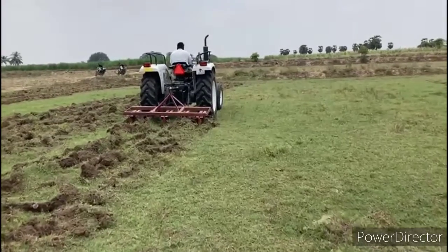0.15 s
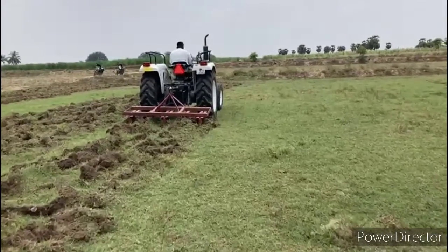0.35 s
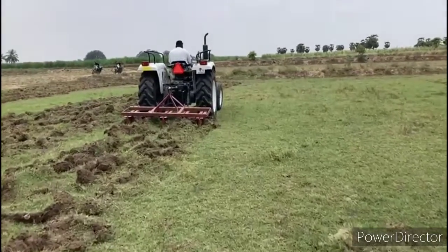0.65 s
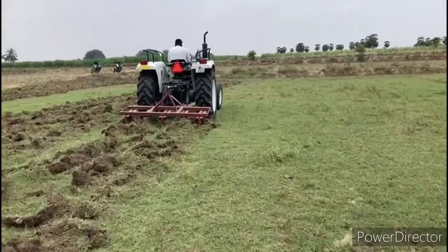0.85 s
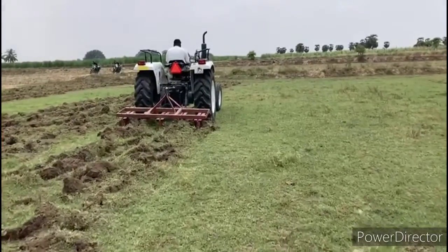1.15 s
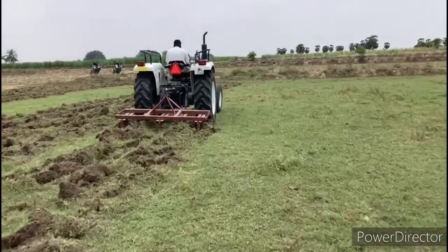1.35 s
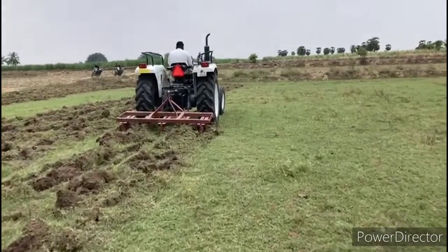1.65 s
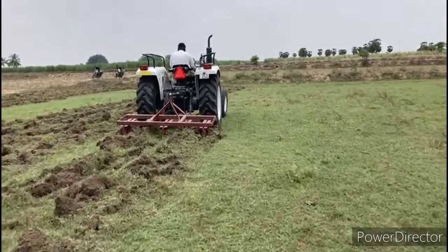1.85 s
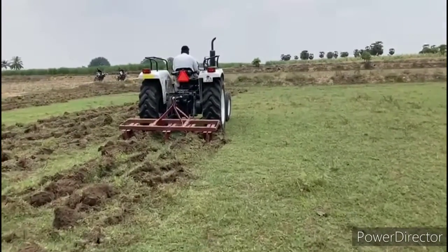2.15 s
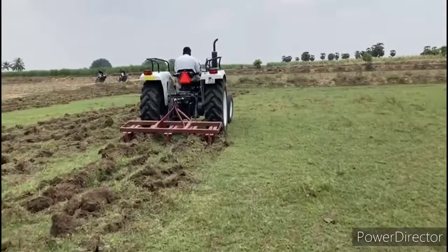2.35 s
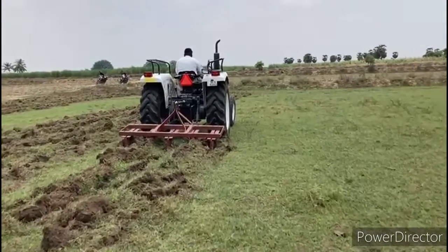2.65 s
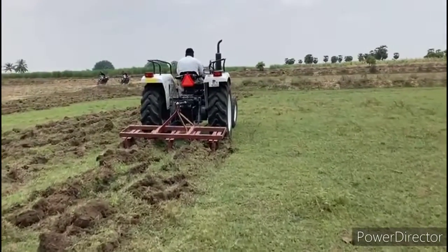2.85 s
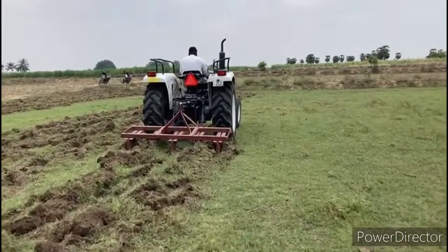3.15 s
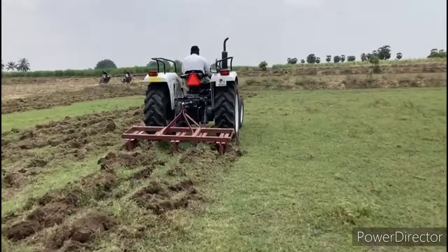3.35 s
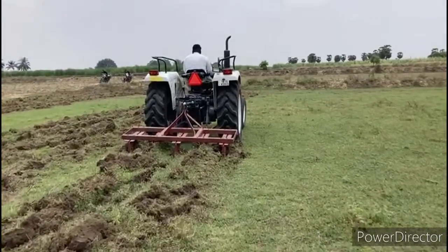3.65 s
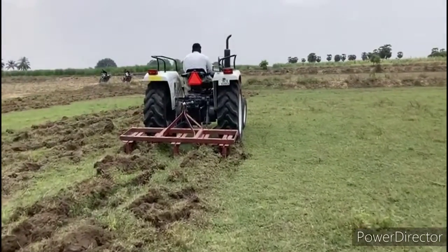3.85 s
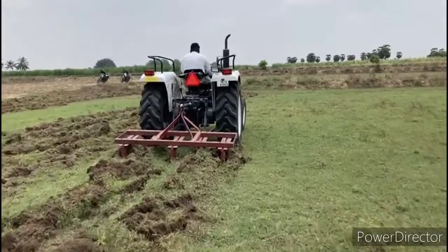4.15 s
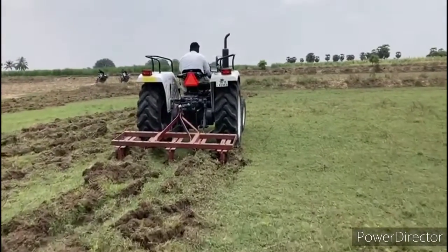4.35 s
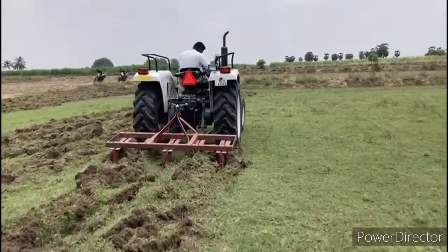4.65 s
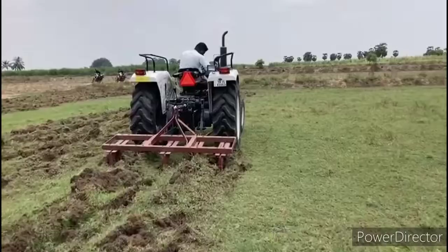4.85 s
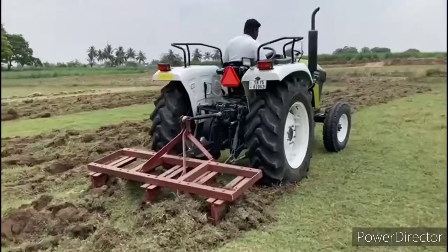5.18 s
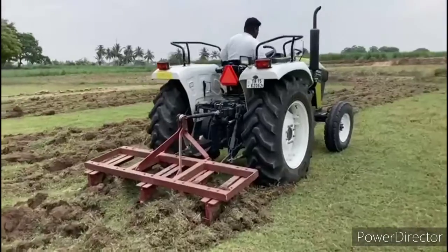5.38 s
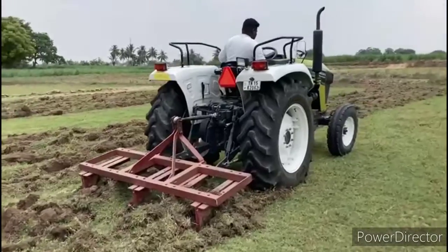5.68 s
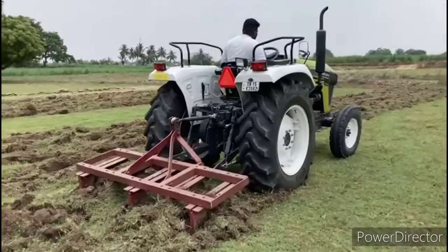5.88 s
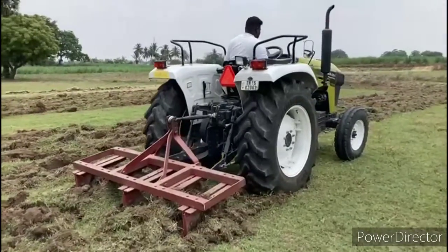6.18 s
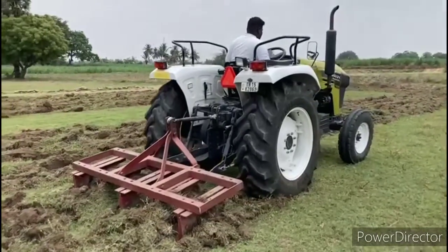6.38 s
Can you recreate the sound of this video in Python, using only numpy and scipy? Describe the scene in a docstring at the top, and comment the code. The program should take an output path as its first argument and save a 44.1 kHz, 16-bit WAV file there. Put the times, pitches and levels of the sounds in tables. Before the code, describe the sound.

A diesel tractor engine revs up, then pulls steadily with a boomy clatter, before jumping suddenly closer and louder as soil crumbles off the tines.

```python
"""Tractor dragging a cultivator

A three-cylinder diesel tractor speeds up in a field and then pulls steadily.
The exhaust booms from shaped noise and tones, the block clatters with every engine cycle,
gears whine, injectors tick, and soil crumbles off the tines as short bursts of noise.
Two microphone ports hear it first from well behind, then abruptly from close beside.
"""
import sys
import numpy as np
from scipy import signal
from scipy.fft import rfft, irfft, next_fast_len
from scipy.io import wavfile
from scipy.ndimage import uniform_filter1d, map_coordinates

SR = 44100
rng = np.random.default_rng(int(sys.argv[2]) if len(sys.argv) > 2 else 0)


def inscribe(sig):
    """Save sig as 16-bit PCM at rate SR to the path in sys.argv[1].

    A 1-D sig is mono; a 2-D sig holds one channel per row.
    Samples are clipped to [-1, 1] before scaling.
    """
    pcm = np.round(np.clip(np.atleast_2d(sig).T, -1, 1) * 32767)
    wavfile.write(sys.argv[1], SR, pcm.astype(np.int16))


N = 287520

CLOSE_S = 5.06  # moment when the listening place jumps from behind to beside
FULL_SPEED = 17.4  # working speed, engine cycles per second

# Engine speed; one cycle is two crank turns and three firings: time_s, speed_cycles_per_s
ENGINE_SPEED = [(0, 12.8), (0.15, 12.9), (0.39, 14.38), (0.72, 14.45), (0.92, 14.87), (1.05, 14.87),
                (1.2, 15.03), (1.35, 16.45), (1.5, 17.45), (1.9, 17.2), (2.9, 17.23), (4, 17.41),
                (5.05, 17.46), (5.07, 17.695), (6.15, 17.7), (6.26, 17.47), (6.36, 17.55), (6.48, 17.75)]
# Combustion bursts within one cycle: place (0-1 of the cycle), size (ratio), length (share of the cycle)
KNOCK_BURSTS = [(0.139, 0.7, 0.12), (0.417, 0.8, 0.059), (0.581, 0.47, 0.09), (.8, 0.24, .07)]
# Treble colour shared by injectors, soil and clods: pitch_hz, level_db (only the shape counts)
HISS_COLOUR = [(1500, -35), (3000, 9), (5500, 1.5), (7500, 10.5), (9600, 4.5), (11200, 9), (12000, -4.5)]


def exhaust(cycles):
    """Firing tones, and rough puffs whose boom climbs with engine speed over the pipe's fixed ring."""
    # Silencer colour at full speed: pitch_hz, level_db (only the shape counts)
    pipe_colour = [(30, -32), (70, -16.5), (120, -10.5), (155, -5), (180, -3.5), (205, -5.5), (245, -15),
                   (330, -29.5), (700, -85)]
    # Extra exhaust tones: multiple of the cycle rate, behind_db, beside_db (relative to the puffs)
    exhaust_tones = [(4, -29, -18), (7, -12, -14), (8, -21, -14), (9, -16.5, -11.5), (10, -6, -5),
                     (11, -15.5, -12.5), (12, -8.5, -6.5)]
    # Level of the silencer's boom: time_s, level_db
    boom_level = [(0, -29.5), (.3, -30.5), (.5, -28.5), (1, -29), (1.7, -25.5), (2.2, -24.5), (2.65, -25),
                  (3.3, -24), (3.56, -27), (3.7, -24), (4.3, -23.5), (4.55, -24.5), (5.05, -21.5),
                  (5.4, -21.5), (5.48, -22.5), (5.7, -21), (6, -21), (6.52, -21)]
    # Level of the firing tone: time_s, level_db
    firing_level = [(0.0, -47), (0.6, -44), (1.24, -45), (1.32, -33), (1.56, -45), (1.68, -38), (2.52, -41),
                    (2.84, -44), (4.12, -41), (4.8, -38.5), (5.28, -35), (5.92, -32), (6.32, -35),
                    (6.52, -34)]
    # Level of its octave: time_s, level_db
    octave_level = [(0.0, -42), (0.28, -30.5), (0.56, -37), (1.12, -35), (1.56, -30.5), (1.96, -39),
                    (2.08, -33), (2.48, -34), (2.6, -34), (3.28, -34), (3.48, -33.5), (3.92, -32.5),
                    (4.04, -39.5), (4.88, -37.5), (5.56, -33), (5.84, -32), (6.36, -28), (6.52, -34)]
    # Level of its third harmonic, which sings as the engine speeds up: time_s, level_db
    third_level = [(0, -48), (.35, -41), (.6, -29.5), (.9, -31.5), (1.3, -35), (1.7, -52)]

    steady = np.arange(N) / SR * FULL_SPEED
    puffs = colour(rng.standard_normal((2, N)) * bursts(steady, KNOCK_BURSTS, base=2.7), pipe_colour)
    # Play the steady puffs slower or faster, so their pitch follows the engine.
    position = cycles * SR / FULL_SPEED
    climbing = np.array([map_coordinates(side, [position], mode="mirror") for side in puffs])
    ring = colour(rng.standard_normal((2, N)) * bursts(cycles, KNOCK_BURSTS, base=1.2), pipe_colour)
    tones = lines(cycles, exhaust_tones, waver_db=2.5, drift=0.455)
    boom = amp(-4.0) * climbing + amp(-6.5) * ring + tones
    boom = amp(curves(boom_level)[0]) * evened(boom, seconds=.06, share=.7)

    firings = 3 * cycles
    throb = 0
    for multiple, level in enumerate([firing_level, octave_level, third_level], 1):
        phase = 2 * np.pi * multiple * firings + multiple * 0.17 * wobble(7.2)
        throb = throb + amp(curves(level)[0]) * np.sqrt(2) * np.sin(phase)
    return boom + boom_swells(boom[0]) + throb


def boom_swells(boom):
    """The boom swells irregularly for a few periods, starting from its own phase."""
    # Boom swells: peak_s, level_db (before the trim below), pitch_hz, length_s
    swell_table = [(0.168, -26, 174, .03), (0.38, -28, 174, .025), (0.452, -24, 185, .025),
                   (.477, -24, 190, 0.018), (0.827, -24, 166, .025), (0.912, -20, 155, .035),
                   (0.978, -18.5, 159, 0.027), (1.037, -21, 160, .025), (1.1, -22, 162, .025),
                   (1.161, -20, 160, .025), (1.229, -21.5, 170, 0.035), (1.315, -19.5, 162, 0.066),
                   (1.55, -21, 176, .03), (1.754, -18, 175, .03), (1.814, -21, 175, 0.033),
                   (1.87, -27, 173, .025), (2.173, -20.5, 192, .03), (2.212, -22, 185, .025),
                   (2.304, -22, 176, .04), (2.506, -20, 176, 0.022), (2.543, -20.5, 190, 0.028),
                   (2.787, -16.5, 177, 0.073), (2.877, -19.5, 172, 0.033), (2.978, -25, 187, .025),
                   (3.222, -22, 177, 0.026), (3.418, -21, 174, 0.056), (3.627, -18.5, 174, 0.045),
                   (3.685, -17, 183, .03), (3.751, -21, 180, 0.027), (3.846, -15, 172, .03),
                   (3.894, -17, 186, 0.028), (4.091, -20, 180, 0.021), (4.269, -17.5, 183, .035),
                   (4.36, -14.5, 190, 0.032), (4.679, -17, 186, 0.027), (4.731, -17, 194, .025),
                   (4.781, -17, 175, 0.038), (4.944, -17.5, 186, 0.028), (5.008, -24, 181, 0.028),
                   (5.194, -16.5, 194, .03), (5.303, -18, 187, 0.03), (5.384, -14, 181, 0.054),
                   (5.592, -18, 192, .025), (5.64, -14.5, 189, 0.033), (5.865, -16, 190, 0.035),
                   (5.903, -23, 185, 0.028), (6.01, -22, 176, 0.022), (6.1, -21, 174, 0.023),
                   (6.159, -19, 180, .025), (6.298, -14, 175, 0.029), (6.353, -15, 183, 0.019),
                   (6.41, -15, 185, 0.032), (6.457, -14, 178, 0.022)]
    trim_db = -3.5
    t = np.arange(N) / SR
    boom_phase = np.angle(signal.hilbert(boom))
    total = 0
    for peak_s, level_db, pitch_hz, length_s in swell_table:
        swell = amp(level_db + trim_db) * np.exp(-(2 * (t - peak_s) / length_s) ** 2)
        start_phase = np.take(boom_phase, int(peak_s * SR), mode="clip")
        total = total + swell * np.sqrt(2) * np.cos(2 * np.pi * pitch_hz * (t - peak_s) + start_phase)
    return total


def block(cycles):
    """Combustion thuds in the lower block and clatters in the panels, over droning harmonics and fan."""
    # Thud bursts within one cycle: place (0-1 of the cycle), size (ratio), length (share of the cycle)
    thud_bursts = [(0.122, 0.54, 0.14), (.47, 0.096, 0.075), (.8, 0.22, 0.099)]
    # Lower block colour from behind: pitch_hz, level_db (only the shape counts)
    thud_behind = [(140, -25), (260, -5.5), (340, -10.5), (520, -12), (750, -15), (950, -21), (1300, -47)]
    # The same from beside: pitch_hz, level_db
    thud_beside = [(140, -24), (250, -3), (390, -4), (490, -9.5), (750, -12.5), (950, -14.5), (1300, -56)]
    # Upper block colour from behind: pitch_hz, level_db (only the shape counts)
    clatter_behind = [(600, -37), (1000, -18.5), (1500, -21.5), (1850, -25), (3000, -34), (5000, -84)]
    # The same from beside: pitch_hz, level_db
    clatter_beside = [(600, -42), (1030, -21.5), (1400, -15), (1650, -25.5), (2000, -16.5), (2500, -36),
                      (5000, -90)]
    # Resonances of block, bonnet and mudguards: pitch_hz, width_hz, lift_behind_db, lift_beside_db
    panels = [(417, 24, -0.5, 6), (519, 49, 4, -0.5), (680, 59, 1, -0.5), (593, 39, -1.5, 6.5),
              (764, 89, 1.5, 3), (905, 100, 2, 3), (1164, 215, 5, 6), (1322, 46, 4, 1), (1462, 51, 8, 5.5),
              (1556, 50, 7, 4)]
    # Fan and block tones: multiple of the cycle rate, behind_db, beside_db (before the shared trim)
    whine_tones = [(15.3, -1.5, -2), (18, -19, -7.5), (19, -16, -19), (20, -21, -14), (21, -24, -13),
                   (22, -24, -10), (23, -17, -16), (24, -24, -11), (26, -16, -15), (28, -17, -17),
                   (29, -17, -23), (30, -13, -20), (31, -17, -21), (33, -19, -16), (36, -19, -21),
                   (38, -22, -18), (39, -16, -26), (40, -16, -14), (42, -25, -12), (43, -25, -15),
                   (44, -20, -22), (53, -28, -20), (62, -22, -25), (65, -23, -27), (66, -27, -19),
                   (76, -18.5, -14), (83, -27, -17), (84, -20, -22), (86, -22, -28), (93, -27, -32),
                   (98, -33, -20)]
    # Lower block loudness: behind_db, beside_db, db per halving of distance, db per extra cycle/s,
    # db at full throttle
    thud_law = (-30, -30, 7, 0.9, 0.6)
    # Loudness of the upper block and panels: same columns
    clatter_law = (-36.5, -36, 5, 0.72, 2.3)

    shaken = cycles + .0025 * wobble(9)  # the crank never turns quite evenly
    thuds = repeating(shaken, loose=.75) * bursts(cycles, thud_bursts, base=.9) * amp(1.0 * wobble(50))
    knocks = repeating(shaken, loose=.62) * bursts(cycles, KNOCK_BURSTS, base=1.2) * amp(1.2 * wobble(28))
    thuds, knocks = patchy(thuds), patchy(knocks)
    rear = [(hz, width, db) for hz, width, db, _ in panels]
    flank = [(hz, width, db) for hz, width, _, db in panels]
    thud = by_view(colour(thuds, thud_behind, rear), colour(thuds, thud_beside, flank))
    clatter = by_view(colour(knocks, clatter_behind, rear), colour(knocks, clatter_beside, flank))
    whine = amp(by_view(-4, -7)) * lines(shaken, whine_tones, waver_db=3, drift=.45)
    lower = amp(by_view(-0.73, -.6)) * thud + whine
    return loudness(thud_law) * lower + loudness(clatter_law) * clatter


def valves(cycles):
    """The valve train rattles lightly: dense taps that swell with the knocks."""
    # Valve colour from behind: pitch_hz, level_db (only the shape counts)
    valves_behind = [(1200, -6), (1700, -0.5), (2100, 5.5), (2280, 3.5), (2450, 1), (3100, -0.5),
                     (4000, -3.5), (5100, -11), (9000, -49)]
    # The same from beside: pitch_hz, level_db
    valves_beside = [(1200, -15), (1700, 5.5), (2100, 3.5), (2350, 2.5), (2750, -0.5), (3400, -4),
                     (3900, -1), (5000, -6), (6200, -8.5), (9000, -18)]
    # Valve loudness: behind_db, beside_db (before the trims below), db per halving of distance,
    # db per extra cycle/s, db at full throttle
    valves_law = (-40.5, -38.5, 6.5, 1.26, 0.5)
    taps = repeating(cycles, loose=0.86) * bursts(cycles, KNOCK_BURSTS, base=2.9) * amp(1.0 * wobble(22))
    taps = patchy(taps)
    rattle = by_view(amp(1.5) * colour(taps, valves_behind), amp(0.76) * colour(taps, valves_beside))
    return loudness(valves_law) * rattle


def gears(cycles):
    """The timing gears sing thinly at fixed multiples of the cycle rate."""
    # Gear tones: multiple of the cycle rate, behind_db, beside_db (relative to the level below)
    gear_tones = [(126, 0, 0), (133, -4, -12)]
    # Level of the gear song: time_s, level_db
    gear_level = [(0, -58), (.5, -53.5), (1, -56), (1.6, -65), (4, -65), (4.7, -59), (6.52, -58)]
    return amp(curves(gear_level)[0]) * lines(cycles, gear_tones, waver_db=3, drift=0.57)


def treble(crank):
    """Injector ticks and falling soil share one level that changes over time."""
    # Shared treble level: time_s, level_db (before the mix gains below)
    treble_level = [(0.0, -65), (0.24, -53), (0.56, -59), (0.88, -55.5), (1.04, -55.5), (1.4, -48),
                    (2.72, -49.5), (3.0, -50.5), (3.28, -47), (3.4, -51.5), (4.16, -47), (4.88, -48),
                    (5.05, -49.5), (5.07, -43), (6.32, -39), (6.52, -37.5)]
    mix = amp(1.5) * injectors(crank) + amp(-10.5) * soil(per_second=1200, spread_db=10.0)
    return amp(curves(treble_level)[0]) * mix


def injectors(cycles):
    """Bright ticks of noise, one cylinder much sharper than the others."""
    # Ticks within one cycle: place (0-1 of the cycle), size (ratio), length (share of the cycle)
    tick_bursts = [(.14, 0.48, 0.15), (.49, 0.97, 0.083), (.82, .17, 0.047)]
    ticks = by_view(bursts(cycles, tick_bursts, base=0.54), bursts(cycles, tick_bursts, base=0.89))
    ticks = uniform_filter1d(ticks, size=120)  # each tick swells over a few milliseconds
    return colour(rng.standard_normal((2, N)) * ticks * amp(1.67 * wobble(30)), HISS_COLOUR)


def soil(per_second, spread_db):
    """Crumbs and dry roots break off the tines in clumps: random clicks of random size."""
    chance = per_second / SR * amp(5.8 * wobble(6))
    sizes = amp(spread_db * np.minimum(rng.exponential(size=N), 3))
    crumbs = (rng.random(N) < chance) * sizes * rng.standard_normal((2, N))
    return colour(crumbs, HISS_COLOUR)


def clods():
    """A few big clods crack on the tines with a short, fading crunch of noise."""
    # Clods: start_s, level_db
    clod_table = [(1.408, -44), (1.641, -43), (5.416, -36), (5.529, -45), (6.263, -39), (6.322, -30.5),
                  (6.49, -40)]
    decay_s = 0.013
    t = np.arange(N) / SR
    crunch = sum(amp(db) * (t >= s) * np.exp(-np.abs(t - s) / decay_s) for s, db in clod_table)
    return colour(rng.standard_normal((2, N)), HISS_COLOUR) * crunch


def tick():
    """One small bright tick as the listening place changes: a single spike without its bass."""
    spike = amp(-17) * (np.arange(N) == round(CLOSE_S * SR))
    return filtered(spike, lambda hz: hz / (hz + 1500))


def throttle():
    """Extra fuel, 0-1: it follows the gain in engine speed, and is zero in the close view."""
    full_rise = 3.9  # gain of speed at full fuel, cycles per second each second
    smooth_s = 0.047
    rise = by_view(np.gradient(curves(ENGINE_SPEED)[0]) * SR, 0)
    return uniform_filter1d(np.clip(rise / full_rise, 0, 1), size=max(1, int(smooth_s * SR)))


def loudness(law):
    """Gain of one part: it grows with nearness, engine speed and throttle."""
    # Distance to the tractor: time_s, distance_m
    distance = [(0, 13.5), (5.05, 8.46), (5.07, 5.9), (6.52, 4.63)]
    reference_m = 9
    behind_db, beside_db, near_db, speed_db, throttle_db = law
    halvings = np.log2(reference_m / curves(distance)[0])
    extra_speed = curves(ENGINE_SPEED)[0] - FULL_SPEED
    return amp(by_view(behind_db, beside_db) + near_db * halvings
               + speed_db * extra_speed + throttle_db * throttle())


def bursts(cycles, table, base):
    """Envelope of rms 1: sharp decaying bursts at fixed crank angles over a steady base."""
    return unit(base + sum(size * np.exp(-((cycles - place) % 1) / length) for place, size, length in table))


def repeating(cycles, loose, size=2520):
    """Two dense trains of contacts that recur every cycle; the share loose is new each time."""
    loose = np.clip(loose, 0, 1)
    spectrum = np.exp(2j * np.pi * rng.random((2, size // 2 + 1)))
    place = np.arange(size) / size
    locked = np.array([np.interp(cycles % 1, place, p, period=1) for p in irfft(spectrum, size)])
    return np.sqrt(1 - loose) * unit(locked) + np.sqrt(loose) * rng.standard_normal((2, N))


def lines(cycles, table, waver_db, drift):
    """Tones tied to the crank, each wavering a little in strength and phase."""
    total = 0
    for order, behind_db, beside_db in table:
        strength = amp(by_view(behind_db, beside_db) + waver_db * wobble(7))
        phase = 2 * np.pi * (order * cycles + rng.random()) + drift * wobble(5)
        total = total + strength * np.sqrt(2) * np.sin(phase)
    return total


def patchy(pair):
    """Narrow resonances swell and fade at random, each for about a tenth of a second."""
    spread_db = 1.8  # how far the resonances come and go, rms
    z = signal.stft(pair, nperseg=2048)[2]
    field = uniform_filter1d(rng.standard_normal(z.shape[1:]), size=2, axis=0)  # across pitch
    field = uniform_filter1d(field, size=5, axis=1)  # across time
    return unit(signal.istft(z * amp(spread_db * unit(field)), nperseg=2048)[1][:, :N])


def evened(pair, seconds, share):
    """Take a share out of the slow swells and leave the quick beats."""
    power = np.abs(uniform_filter1d(np.mean(pair[:1] ** 2, axis=0), size=max(1, int(seconds * SR))))
    return unit(pair / (power + 1e-9) ** (.5 * np.clip(share, 0, 1)))


def colour(pair, spectrum, modes=()):
    """Shape a pair of signals by a spectrum with resonant lifts, to rms 1."""
    def lift_db(hz):
        return sum(db / (1 + (2 * (hz - centre) / width) ** 2) for centre, width, db in modes)
    return unit(filtered(pair, lambda hz: amp(along(spectrum, hz) + lift_db(hz))))


def ports(pair):
    """A shared and an unshared part reach the two ports, with a phase lead that depends on the view."""
    # Likeness of the two ports: pitch_hz, likeness (0-1), left lead behind and beside (half turns)
    port_table = np.array([(60, .98, 0, 0), (150, .993, 0, 0), (600, .975, 0, 0), (1300, .93, .03, 0),
                           (1900, .6, .25, -.1), (2280, .55, 1, 1), (2600, .7, 2.25, 1.85),
                           (4300, .55, 2.3, 1.75), (5200, .95, 2.95, 1.6), (6000, .95, 2.95, 1.8),
                           (6600, .97, 2, 2), (7500, .95, 1.95, 1.95), (8500, .97, 1.05, 1.05),
                           (9800, .97, .95, .95), (10500, .99, 0, 0)])
    # Balance between the ports: pitch_hz, left_minus_right_db
    balance = [(30, -2), (70, -1.5), (150, 0), (300, .2), (700, 1.4), (1400, 2.4), (2800, 3.3), (4200, -.1)]

    def column(hz, axis):
        return along(port_table[:, [0, axis]], hz)

    def turn(hz):  # an angle that splits shared from unshared sound
        return np.arccos(np.clip(column(hz, axis=1), 0, 1)) / 2

    shared, apart = filtered(pair, lambda hz: np.array([np.cos(turn(hz)), np.sin(turn(hz))]))
    both = np.array([shared + apart, shared - apart])
    half = np.array([[.5], [-.5]])  # each port takes half of the difference

    def heard(axis):
        return filtered(both, lambda hz: amp(half * along(balance, hz))
                        * np.exp(1j * np.pi * half * column(hz, axis=axis)))
    return by_view(heard(axis=2), heard(axis=3))


def by_view(behind, beside):
    """The listening place changes at one instant."""
    return np.where(np.arange(N) < CLOSE_S * SR, behind, beside)


def amp(db):
    """Decibels to gain."""
    return 10 ** (np.asarray(db) / 20)


def unit(x):
    """Scale to rms 1."""
    return x / np.sqrt(np.mean(x ** 2) + 1e-20)


def along(points, hz):
    """Read a curve of (pitch_hz, value) points on a log pitch axis."""
    f, v = np.transpose(points)
    return np.interp(np.log(hz + 1), np.log(f + 1), v)


def curves(rows):
    """One value per sample for each column after the time."""
    s, *cols = np.transpose(rows)
    return np.array([np.interp(np.arange(N) / SR, s, c) for c in cols])


def wobble(rate):
    """A smooth random curve through rate random points a second."""
    coarse = np.arange(0, N, 64)
    knots = rng.standard_normal(int(N * rate / SR) + 4)
    return np.interp(np.arange(N), coarse, map_coordinates(knots, [coarse * rate / SR]))


def filtered(x, response):
    """Multiply the spectrum of x by a response that depends on pitch."""
    size = next_fast_len(N + 8192)
    return irfft(rfft(x, size) * response(np.fft.rfftfreq(size, 1 / SR)), size)[..., :N]


def scene():
    """One crankshaft drives every engine layer while the tines break the soil."""
    cycles = np.cumsum(curves(ENGINE_SPEED)[0]) / SR
    crank = cycles + by_view(0, .47)  # the engine is at another angle when the view changes
    engine = exhaust(cycles) + block(crank) + gears(crank) + valves(crank)
    return tick() + ports(engine + treble(crank) + clods())


def record(dry):
    """Nothing at or above the 12 kHz band limit is kept."""
    return filtered(dry, lambda hz: hz < 12000)


dry = scene()
out = record(dry)
inscribe(out)
```